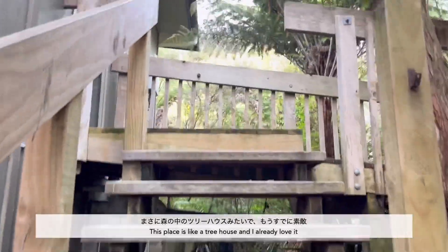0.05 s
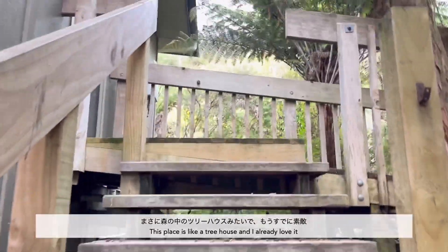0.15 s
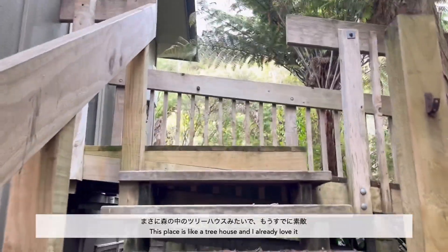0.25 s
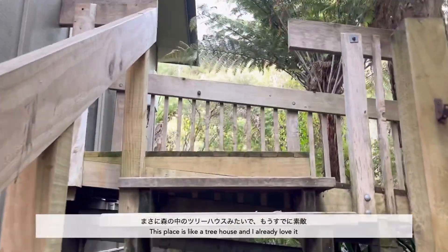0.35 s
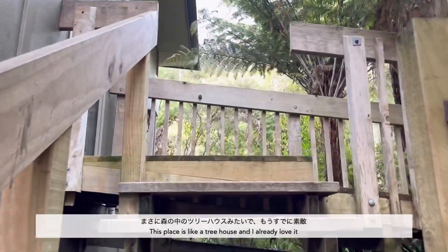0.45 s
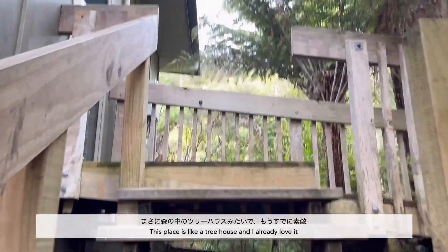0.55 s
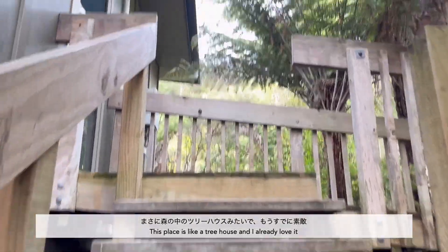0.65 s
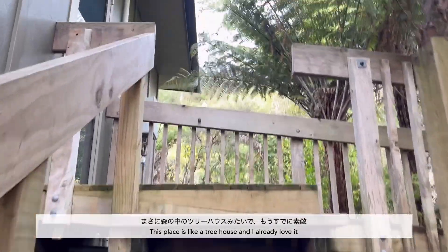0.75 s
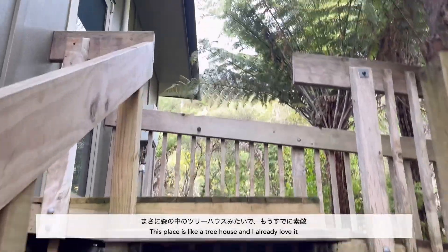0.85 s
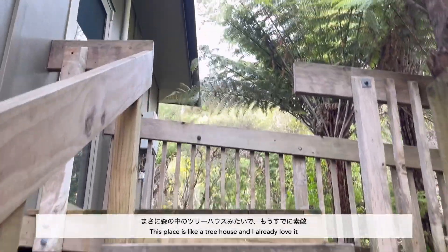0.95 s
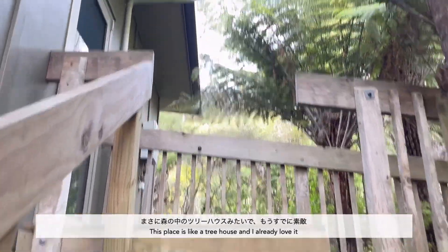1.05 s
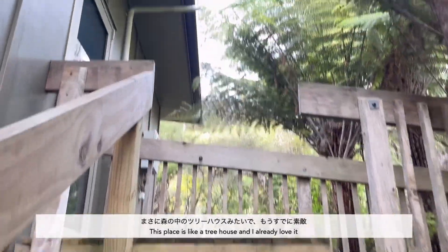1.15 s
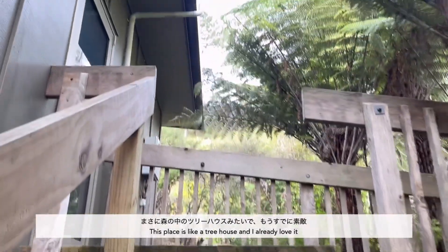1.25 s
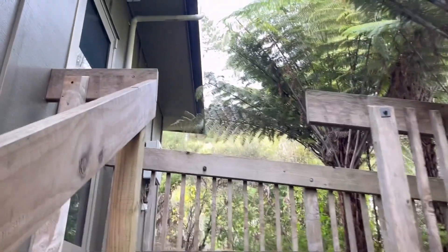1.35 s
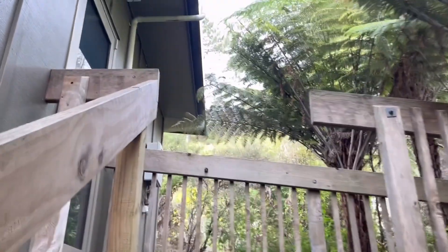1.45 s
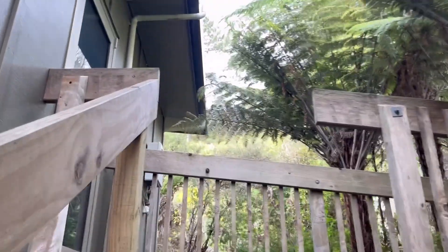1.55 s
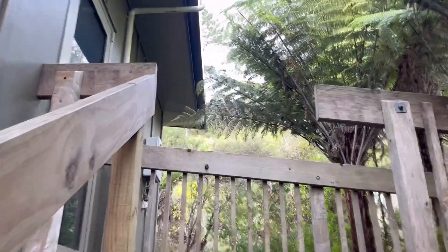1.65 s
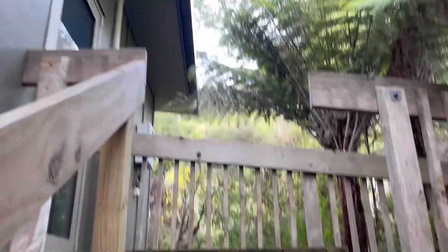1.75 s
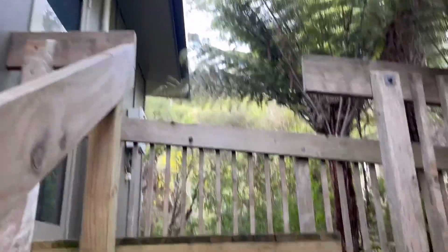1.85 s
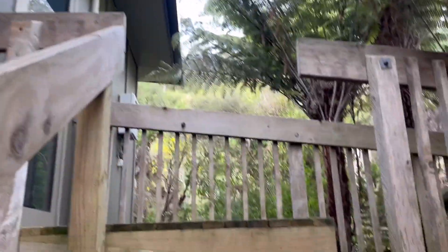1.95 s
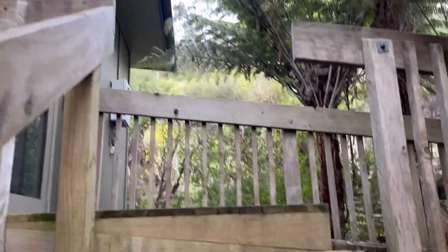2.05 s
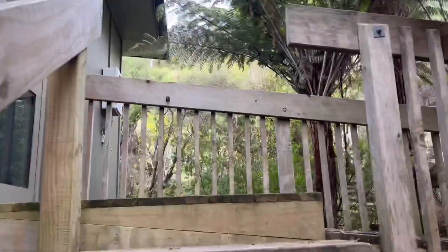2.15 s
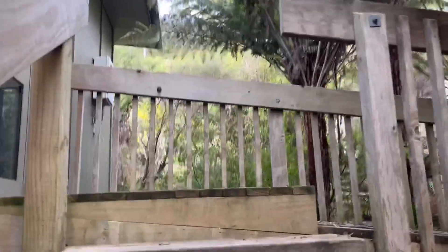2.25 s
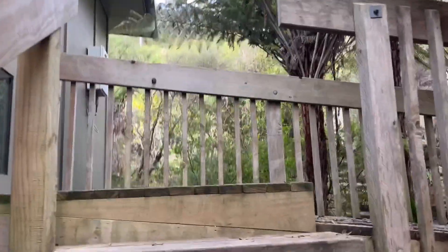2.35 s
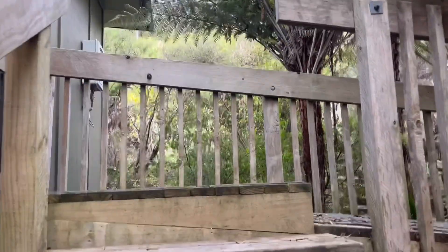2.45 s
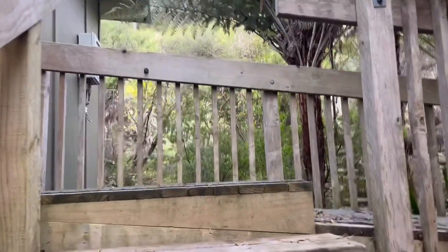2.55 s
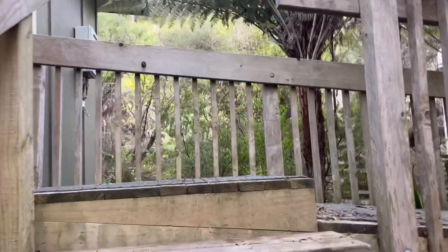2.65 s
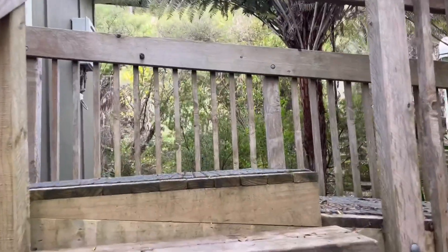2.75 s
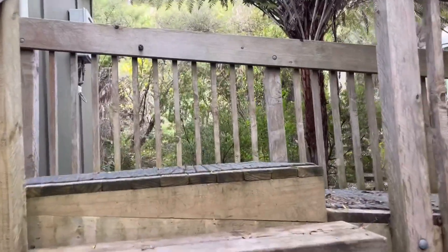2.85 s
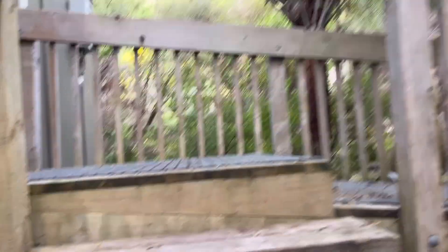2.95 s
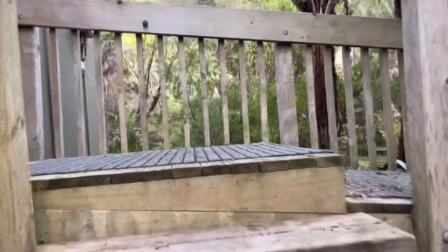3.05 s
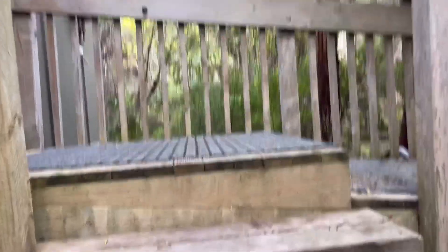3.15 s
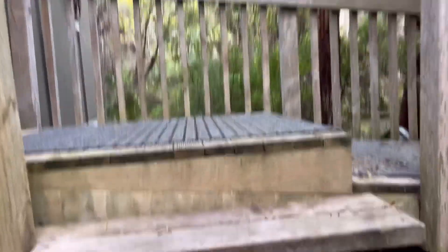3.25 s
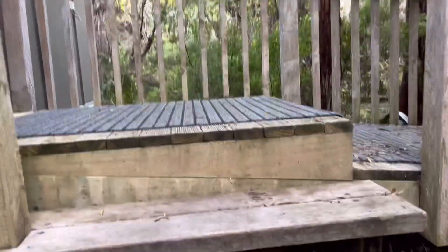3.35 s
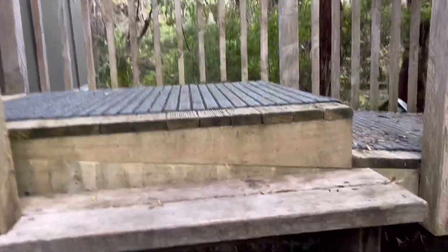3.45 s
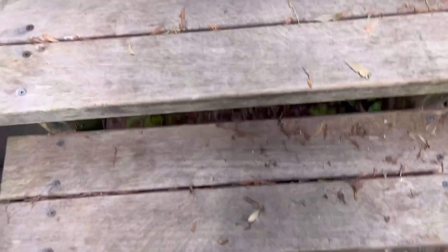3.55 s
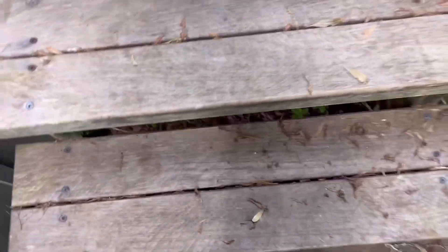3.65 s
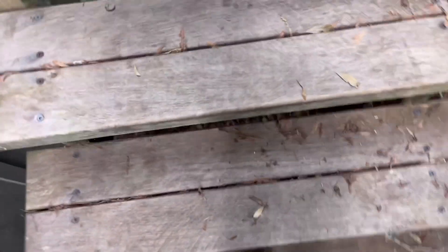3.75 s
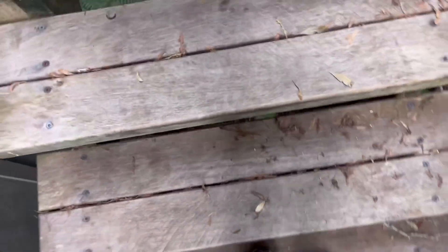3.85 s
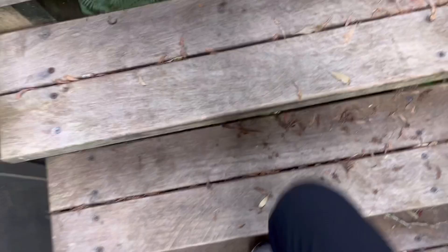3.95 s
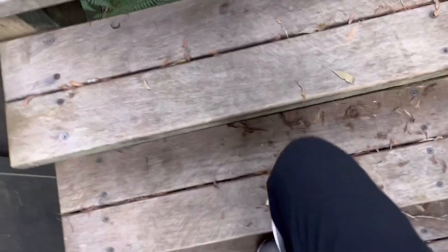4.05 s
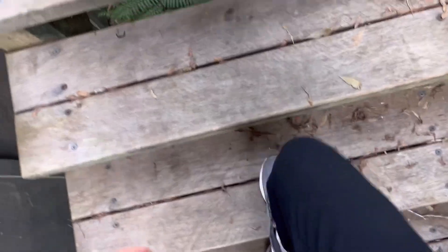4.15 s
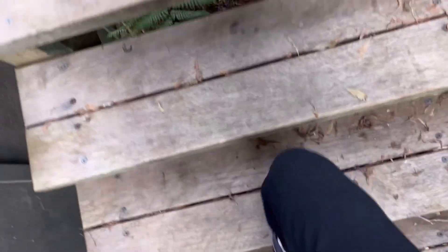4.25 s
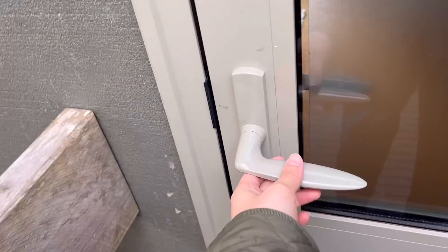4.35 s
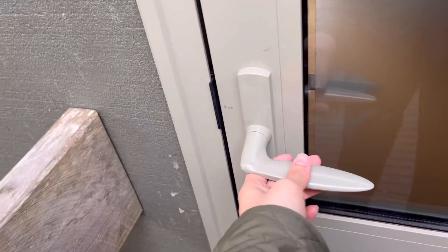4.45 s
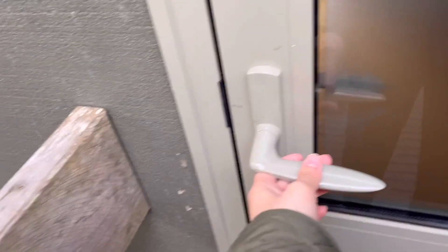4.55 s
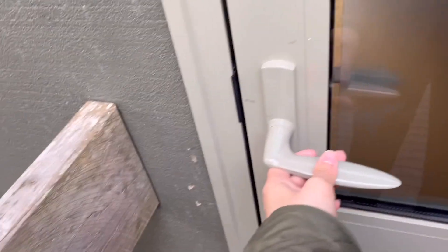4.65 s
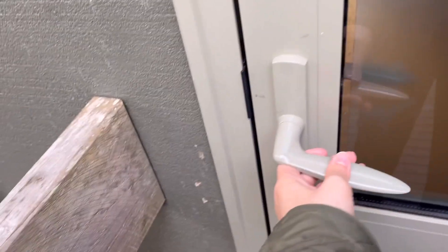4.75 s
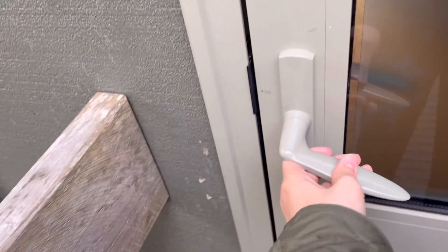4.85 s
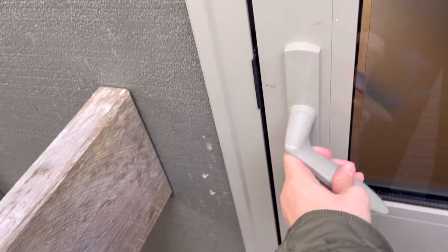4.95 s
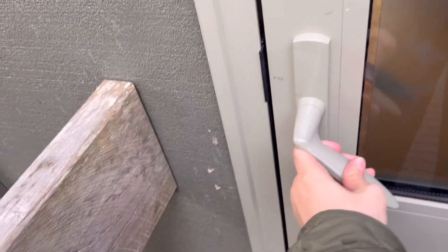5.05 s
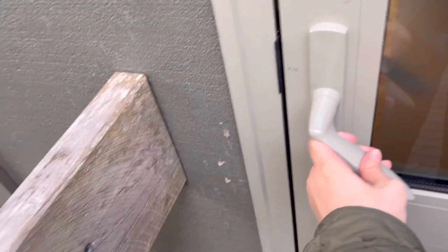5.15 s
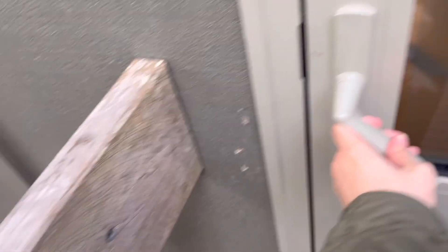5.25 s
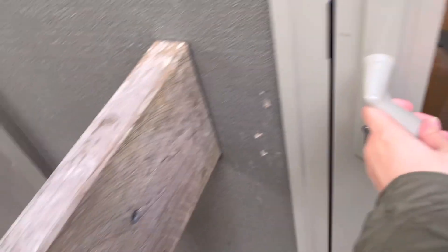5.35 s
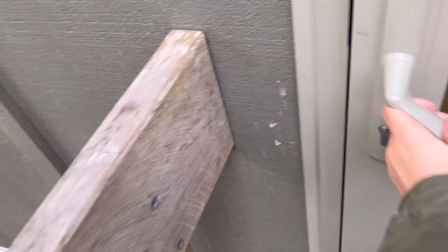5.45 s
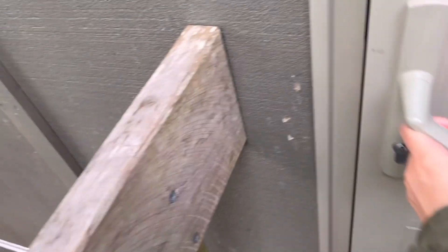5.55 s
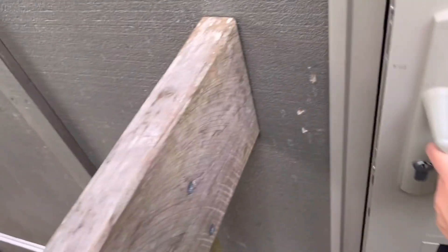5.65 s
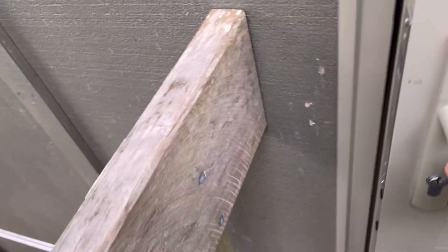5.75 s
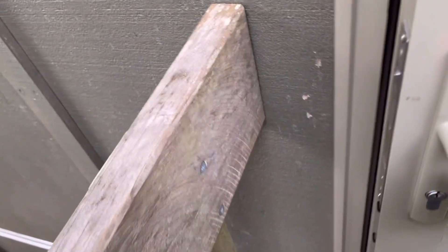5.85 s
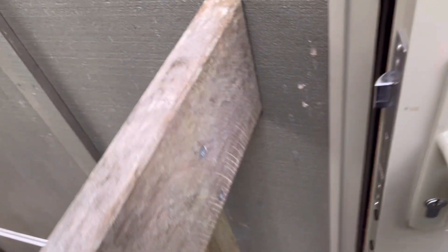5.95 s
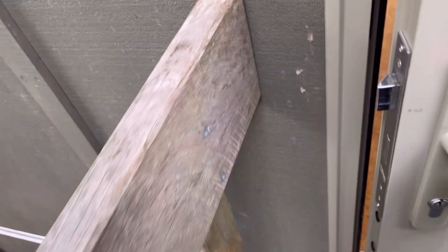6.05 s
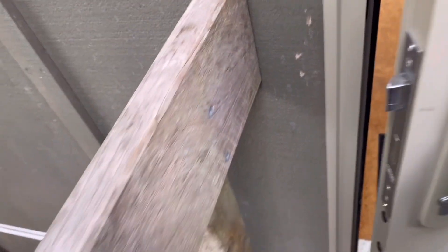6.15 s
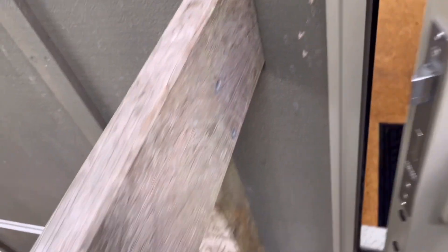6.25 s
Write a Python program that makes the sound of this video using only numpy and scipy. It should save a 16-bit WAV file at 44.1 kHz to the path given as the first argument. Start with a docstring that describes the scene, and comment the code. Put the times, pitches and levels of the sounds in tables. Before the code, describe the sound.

Slow, booming footfalls on timber boards, soft cloth rustle and quiet outdoor rumble, followed by a sharp cluster of door-lock clunks, squeak and latch rattles.

```python
"""Outdoor stairs, deck and door

Someone climbs wooden outdoor stairs, crosses a timber deck and opens a glazed metal door. Each shoe taps
a board and sets its modes booming; bolts, latch and leaf are struck as damped resonators, and the seal
drags by stick and slip. Shaped noise makes the jacket's rustle, the rumbling air and a brief bright hiss,
gliding sines the far bird and a slowly wavering sine the hum; the house wall answers with a diffuse decay."""
import sys
import numpy as np
from scipy import signal
from scipy.fft import rfft, irfft, next_fast_len
from scipy.io import wavfile
from scipy.ndimage import uniform_filter1d, map_coordinates

SR = 44100
rng = np.random.default_rng(int(sys.argv[2]) if len(sys.argv) > 2 else 0)


def put_to_file(sound):
    """Save the sound as 16-bit audio at rate SR, in the file named by the first command-line argument."""
    columns = np.atleast_2d(sound).T  # one column per channel
    safe = np.clip(columns, -1, 1)
    whole_steps = np.round(safe * 32767)
    wavfile.write(sys.argv[1], SR, whole_steps.astype(np.int16))


N = 277389
T = np.arange(SR // 3) / SR  # the life of one blow, t/s

# footfalls: t/s, board loading level/dB (before a 1.5 dB cut), sole strike level/dB,
# tap note f/Hz, its level/dB re strike, span mode f/Hz, plank mode f/Hz, its level/dB re span,
# twist mode f/Hz, its level/dB re span, cross-grain mode f/Hz, its level/dB (before a 5 dB cut)
FOOTFALLS = [(0.297, -49, -83, 1160, 2, 101.5, 159.3, 6.5, 205, -5, 370, -54.5),
             (0.549, -31.5, -46.5, 1600, 1, 125.7, 151, 5, 245.6, -7, 499, -48),
             (1.285, -47, -70, 1320, -1, 107, 126.3, 1, 205, -6.5, 377, -55),
             (1.350, -37, -52.5, 1290, -4, 94.6, 158, -4.5, 231.5, -15, 520, -50.5),
             (2.108, -30.5, -39.5, 1394, -7.5, 85, 146.2, 2.5, 189, -4, 632, -38),
             (2.833, -32, -43, 1392, -1, 91, 186.7, -5, 122, -2, 520, -36.5),
             (2.972, -40, -51, 1473, -0.5, 79.7, 149.6, -5, 123, -1, 522, -44.5),
             (2.995, -45.5, -55, 1095, -3, 78.2, 140.3, -8, 178, -8, 690, -50),
             (3.498, -30.5, -63, 1090, -7, 66.2, 175.2, -0.5, 120, -13, 431, -38),
             (3.571, -36.5, -54, 1570, 0, 70, 154.7, -2, 100, 0, 430, -45),
             (4.168, -33, -46, 1943, 0, 72, 195, -10, 269, -15, 598, -37.5)]


def amp(db):
    """Decibels to amplitude ratio: 20 dB is a factor of ten."""
    return 10 ** (np.asarray(db) / 20)


def unit(x):
    """Normalisation to an rms of 1."""
    return x / np.sqrt(np.mean(x ** 2) + 1e-20)


def struck(x, size=660):
    """Onset normalisation: the first samples of a blow are given an rms of 1."""
    return x / np.sqrt(np.mean(x[..., :size] ** 2) + 1e-20)


def along(points, hz):
    """Interpolation of (f/Hz, value) points on a logarithmic frequency axis."""
    f, v = np.transpose(points)
    return np.interp(np.log(hz + 1), np.log(f + 1), v)


def curve(rows):
    """Linear interpolation in time of (t/s, value) rows, one value per sample."""
    return np.interp(np.arange(N) / SR, *np.transpose(rows))


def wobble(rate):
    """Slow random modulation: a smooth spline through random knots, rate of them a second."""
    knots = rng.standard_normal(int(N * rate / SR) + 4)
    return map_coordinates(knots, [np.arange(N) * rate / SR])


def swell(s, length):
    """Gaussian envelope centred on s, with standard deviation length, both in seconds."""
    return np.exp(-.5 * ((np.arange(N) / SR - s) / length) ** 2)


def held(start, length, attack, release):
    """Linear attack, hold, and exponential decay of 60 dB per release time."""
    t = np.arange(N) / SR - start
    return np.clip(t / attack, 0, 1) * amp(-60 * np.maximum(t - length, 0) / release)


def filtered(x, response):
    """Linear filtering: the spectrum is multiplied by a response of frequency."""
    n = x.shape[-1]
    padded = next_fast_len(n + 8192)
    return irfft(rfft(x, padded) * response(np.fft.rfftfreq(padded, 1 / SR)), padded)[..., :n]


def panned(x, side):
    """Interaural level difference by (f/Hz, left-right level/dB) points."""
    return filtered(x, lambda hz: amp(np.outer([.5, -.5], along(side, hz))))


def leading(x, lead):
    """Interaural phase difference by (f/Hz, left lead/rad) points."""
    return filtered(x, lambda hz: np.exp(1j * np.outer([.5, -.5], along(lead, hz))))


def noise(spectrum, width, size):
    """Coloured stereo noise of rms 1; channel coherence is highest in the bass."""
    def mid_and_side(hz):
        spread = width * (hz + 130) / (hz + 900)
        return amp(along(spectrum, hz)) * [np.ones_like(hz), spread]

    mid, side = filtered(rng.standard_normal((2, size)), mid_and_side)
    return unit(np.array([mid + side, mid - side]))


def burst(spectrum, t60, width, attack):
    """High modal density: many short-lived resonances act as noise that builds up and decays."""
    envelope = amp(-60 * T / t60) * (1 - np.exp(-T / attack))
    return struck(noise(spectrum, width, len(T)) * envelope)


def ring(modes, attack, spread, pitch=1):
    """Modal superposition: damped sines, each of random strength, slight detuning and stereo phase."""
    hz, db, t60 = np.transpose(modes)[:, :, None]
    strength, phase, skew, detune = rng.standard_normal((4, len(modes), 1))
    decay = np.exp((db + 2.4 * strength - 60 * T / t60) * np.log(10) / 20)
    angle = (2 * np.pi * (pitch * hz * (1 + 0.004 * detune) * T + phase)).astype(np.float32)
    mid = np.sum(decay * np.cos(spread * skew) * np.sin(angle), 0)
    side = np.sum(decay * np.sin(spread * skew) * np.cos(angle), 0)
    return struck(np.array([mid + side, mid - side]) * (1 - np.exp(-T / attack)))


def twang(hz, t60):
    """Mode cluster: a small part's main mode stands between two weaker, shorter ones."""
    modes = [(hz * 0.897, -7, t60 * 0.66), (hz, 0, t60), (hz * 1.13, -5, t60 * 0.55)]
    return ring(modes, attack=0.0001, spread=0.31)


def crumbs(depth_db):
    """Granular fracture: an uneven gain, as of grains breaking one after another."""
    return unit(amp(depth_db * unit(uniform_filter1d(rng.standard_normal(len(T)), size=70))))


def answered(x, wet_db):
    """Diffuse reverberation: wall, eaves and railings return a blow, the treble dying soonest."""
    # reverberation time: f/Hz, t60/s
    wall_t60 = [(100, 0.53), (500, 0.15), (2000, 0.11), (6000, 0.09), (12000, 0.075)]
    hz, t, cells = signal.stft(rng.standard_normal((2, len(T))), SR, nperseg=256)
    fading = cells * amp(-60 * t / along(wall_t60, hz)[:, None])
    mid, side = signal.istft(fading, SR, nperseg=256)[1][:, :len(T)] * (1 - np.exp(-T / 0.01))
    tail = np.array([mid + 0.65 * side, mid - 0.58 * side])
    tail = tail / np.linalg.norm(tail[0])
    return x + amp(wet_db) * signal.fftconvolve(x, tail, axes=1)[:, :len(T)]


def add(track, s, x):
    """Superposition: x is mixed into the track at s seconds."""
    room = track[:, round(s * SR):][:, :len(T)]
    room += x[:, :room.shape[1]]


def boom(span_hz, plank_hz, plank_db, twist_hz, twist_db):
    """Gradual loading excites low modes: the span swings, the plank bends and twists, the frame shudders."""
    span = np.sin(2 * np.pi * span_hz * T) * amp(-60 * T / 0.36)
    plank = np.sin(2 * np.pi * plank_hz * T) * amp(plank_db - 60 * T / 0.38)
    twist = np.sin(2 * np.pi * twist_hz * T) * amp(twist_db - 60 * T / 0.27)
    shudder = [(20, -39), (55, 6), (110, 5), (200, 1.5), (280, -10.5), (450, -24.5), (1500, -100)]
    frame = noise(shudder, 0.12, len(T)) * amp(-4.0 - 60 * T / 0.27)
    return struck((span + plank + twist + frame) * (1 - np.exp(-(T / 0.015) ** 2)), size=1764)


def footsteps():
    """Impact on a plank: the tap, crushed grit, wooden knock and boom; softer strikes rise more slowly."""
    # the plank's higher modes: f/Hz, level/dB, t60/s
    plank_modes = [(242, -12.5, 0.15), (340, -7, 0.1), (411.4, 2.5, 0.13), (494, -3.5, 0.17),
                   (599, -2, 0.09), (695, 0, 0.06), (830, -5.5, 0.093), (957, -4, 0.096), (1113, -8, 0.062)]
    # spectral density of the crushed grit and of the hollow knock: f/Hz, level/dB
    grit_colour = [(700, -10), (2200, 0.5), (3500, 1.5), (5200, 7.5), (7000, -6.5), (8500, -23.5),
                   (11000, -17), (15500, -35)]
    knock_colour = [(40, -36), (120, -33), (300, 11.5), (520, 4.5), (1100, -8), (1600, -6), (3000, -65),
                    (8000, -101)]
    firm_db, full_weight_db = -41, -27.5  # strike and loading of a firm step
    knock_db, knock_grows = -39, 0.41  # at a firm step; dB per dB of strike and of loading
    grit_db, grit_grows = -50, 1.38  # at a firm step; dB per dB of strike, so soft steps crush little
    soft_landing_db = 6  # each such drop in strike doubles the rise time, down to 20 dB
    plank_scatter = 0.022  # standard deviation of the log pitch from plank to plank
    track = np.zeros((2, N))
    for s, weight_db, strike_db, tap_hz, note_db, *low_modes, cross_hz, cross_db in FOOTFALLS:
        pitch = np.exp(plank_scatter * rng.standard_normal())
        firmness = strike_db - firm_db
        rise = 0.00058 * 2 ** (np.clip(-firmness, 0, 20) / soft_landing_db)

        sole_colour = [(tap_hz / 10, -35), (tap_hz * 0.24, -10), (tap_hz * 0.52, -8),
                       (tap_hz, -2), (tap_hz * 1.55, -13), (tap_hz * 8, -80)]
        tread_modes = [(tap_hz * 0.75, -9, .035), (tap_hz * 0.93, -4, .035),
                       (tap_hz, 0, .04), (tap_hz * 1.08, -5, .03)]
        pop = ring(tread_modes, attack=rise, spread=0.61)  # the tread's short woody note
        sole = burst(sole_colour, t60=0.038, width=0.89, attack=rise)
        tap = amp(strike_db) * (0.88 * sole + amp(note_db) * pop)

        grains = struck(crumbs(2.5) * burst(grit_colour, t60=0.14, width=0.6, attack=0.00085))
        grit = amp(grit_db + grit_grows * firmness) * grains

        wood = 0.7 * ring(plank_modes, attack=0.0015, spread=0.6, pitch=pitch)
        wood = wood + 0.5 * burst(knock_colour, t60=0.077, width=0.6, attack=0.0044)
        knock = amp(knock_db + knock_grows * (firmness + weight_db - full_weight_db)) * wood

        cross = amp(cross_db - 5.0) * ring([(cross_hz, 0, .085)], attack=0.00079, spread=0.34)
        blow = answered(tap + grit + knock + cross, wet_db=-10.5)
        add(track, s, blow + amp(weight_db - 1.5) * boom(*low_modes))
    return track


def scuffs():
    """Sliding friction: rubber drags over gritty wood as flickering coloured noise."""
    # slides: centre t/s, level/dB, standard deviation t/s
    slides = [(0.54, -71, .006), (1.33, -65.5, .012), (2.106, -56, 0.0059), (3.792, -59.5, 0.037),
              (3.963, -56, 0.066), (4.177, -40, 0.0083), (4.443, -64.5, 0.012)]
    # spectral density: f/Hz, level/dB
    scuff_colour = [(400, 9.5), (1500, 1.5), (2600, 1.5), (4500, -2), (7000, -7), (8500, -18),
                    (11000, -6.5), (14000, -13), (15500, -24)]
    motion = sum(amp(db) * swell(s, length) for s, db, length in slides)
    return motion * unit(amp(1.3 * wobble(700))) * noise(scuff_colour, 0.51, N)


def metal_blow(clack_db, body_db, latch_db):
    """Hard impact: a brief crack excites the lock's clack, the latch's ring and the panel behind them."""
    # modes of the panel, the steel lock and the latch: f/Hz, level/dB, t60/s
    panel_modes = [(413, -6, 0.055), (486, -1.5, 0.11), (587, -8.5, 0.09), (656, -3, 0.04),
                   (853, 0.5, 0.047), (985, 0, 0.063), (1128, 6, 0.028), (1225, 0, 0.04),
                   (1333, -7.5, 0.076)]
    steel_modes = [(1598, -5, 0.06), (1952, -3, 0.073), (2114, -6, 0.076), (2284, -2, 0.084),
                   (2490, 0, 0.046), (2820, -1.5, 0.07), (3157, -6, 0.06), (3341, -6.5, 0.075)]
    latch_modes = [(4035, 7, 0.081), (4170, 3, 0.075), (4500, 5, 0.074), (4660, 3, 0.07), (5100, 1, 0.08),
                   (5850, -3, 0.05)]
    # spectral density of the panel's knock, the clack and the clink: f/Hz, level/dB
    hollow_colour = [(120, -30), (300, 3), (420, 1), (540, 6.5), (750, -2.5), (1100, -3), (1600, -6),
                     (3000, -60), (8000, -100)]
    clack_colour = [(500, -22), (1200, 5), (2000, 6), (2800, 3), (3600, 1), (5000, -14), (6200, -39),
                    (7500, -8.5), (9000, -58), (15000, -57)]
    clink_colour = [(500, -60), (2500, -43), (3600, -1), (4100, 3.5), (5200, -1.5), (6000, -5), (7000, -26),
                    (9000, -46), (15000, -73)]
    hardness = 1 + 1.6 * np.exp(-T / 0.0018)  # extra gain at the instant of contact

    panel = 0.67 * ring(panel_modes, attack=0.00038, spread=0.68)
    panel = panel + 0.59 * burst(hollow_colour, t60=0.058, width=0.74, attack=0.00031)

    clack = 0.49 * ring(steel_modes, attack=0.00046, spread=0.87)
    crack = burst(clack_colour, t60=0.082, width=0.41, attack=0.0002)
    clack = clack + 0.71 * struck(hardness * crack)

    latch = 0.31 * ring(latch_modes, attack=0.00015, spread=0.43)
    clink = burst(clink_colour, t60=0.059, width=0.39, attack=0.00016)
    latch = latch + 0.45 * struck(hardness * clink)
    return amp(clack_db) * (clack + amp(body_db) * panel + amp(latch_db) * latch)


def door():
    """Impact with play: each part touches, seats with a blow that thumps the leaf, and bounces once."""
    # handle, bolt and latch contacts: t/s, play before seating t/s, clack level/dB,
    # body, latch ring and tick level/dB re clack, the part's note f/Hz,
    # its level/dB re clack (before a 3 dB cut), leaf thump level/dB
    contacts = [(4.512, 0.0036, -68.5, 16, -23, -24, 790, 15, -50),
                (4.7185, 0.00061, -46, 4, -12, -40, 1146, 5.5, -47),
                (4.7235, 0.0012, -51, 2.5, -7, -35, 970, 4, -44.5),
                (4.786, 0.0012, -46.5, -2.5, -10, -28, 1251, 4.5, -48),
                (4.7924, 0.0008, -47.5, -1, -7, -30, 3300, 0.5, -43),
                (4.7985, 0.001, -50, 2, -12, -35, 1520, 1, -40),
                (4.909, 0.0036, -37.5, -3.5, -0.5, -3.5, 995, -4, -44),
                (4.9295, 0.0015, -36, 3.5, -5, 0.5, 1155, 9.5, -42),
                (4.935, 0.003, -31.5, 7, -0.5, -3, 850, 5.5, -34),
                (4.9412, 0.000996, -29, 3, 1.5, -14.5, 2500, 0.5, -37),
                (5.176, 0.001, -46.5, -4, -6, -10, 2620, 2.5, -52),
                (5.1894, 0.0012, -40, -4, -2, -4, 2540, 3.5, -44.5),
                (5.257, 0.0031, -40.5, 2.5, -2, -12.5, 1390, 1.5, -43),
                (5.265, 0.0025, -46, 2.5, -8, -12, 1000, 0, -47),
                (5.3208, 0.0012, -44, -1, -16, -24, 1600, 6.5, -47.5),
                (5.4016, 0.002, -39, -10, -1.5, -13, 1953, 7, -48),
                (5.534, 0.0015, -59, 10, -16, -31, 910, 3, -48.5),
                (5.547, 0.0035, -58, 8.5, -16, -31, 1330, -6, -47.5),
                (5.8052, 0.001, -35.5, -8, -3.5, -12, 1950, -5, -45.5),
                (5.8096, 0.002, -36, 0, 1, -21, 1580, -10, -41.5),
                (5.9045, 0.0048, -29.5, -9, 10.5, -2.5, 4320, 5, -49),
                (5.918, 0.0039, -35, 4.5, 1, -22, 1200, -4, -43),
                (5.946, 0.00098, -32.5, -9, -4, -16, 2090, 0.5, -48),
                (5.9507, 0.00098, -29, -4, 3, -17.5, 1260, -3, -42.5),
                (6.0725, 0.0049, -35, 0, -3, -7.5, 1266, -1, -44.5),
                (6.081, 0.002, -37.5, 3, -6, -6.5, 545, 9.5, -43.5)]
    # the leaf's modes: f/Hz, level/dB, t60/s
    leaf_modes = [(69.2, -3.5, 0.16), (112, 0.5, 0.11), (149.8, -1.5, 0.23), (202, -3.5, 0.1),
                  (261.3, -1, 0.064), (321, -12, 0.098)]
    # spectral density of the tick and of the leaf's slow sway: f/Hz, level/dB
    tick_colour = [(2000, -34), (6000, 4), (8500, 1.5), (10500, 4.5), (13000, -7.5), (15800, -14)]
    sway_colour = [(20, -12), (45, -13), (70, 9), (100, -16), (200, -40), (600, -95.5)]
    touch_db = -7.5  # the light first touch, relative to the seating blow
    sway_db, sway_t60_s, sway_attack_s = -6, 0.59, 0.022  # level relative to the thump
    rebound_s, rebound_db, rebound_scatter = .02, -21, .25  # median flight, loss, log deviation of flight
    track = np.zeros((2, N))
    for s, play_s, clack_db, body_db, latch_db, tick_db, note_hz, note_db, thump_db in contacts:
        tick = amp(clack_db + tick_db) * burst(tick_colour, t60=0.04, width=0.27, attack=0.00034)
        touch = metal_blow(clack_db + touch_db, body_db, latch_db)
        add(track, s, answered(tick + touch, wet_db=-15.5))

        sway_envelope = amp(sway_db - 60 * T / sway_t60_s) * (1 - np.exp(-T / sway_attack_s))
        sway = noise(sway_colour, 0.13, len(T)) * sway_envelope
        leaf = amp(thump_db) * (ring(leaf_modes, attack=0.0036, spread=0.06) + sway)
        note = amp(clack_db + note_db - 3.0) * twang(note_hz, t60=0.033)
        blow = metal_blow(clack_db, body_db, latch_db)
        add(track, s + play_s, answered(blow + leaf + note, wet_db=-13.5))

        flight_s = rebound_s * np.exp(rebound_scatter * rng.standard_normal())
        add(track, s + play_s + flight_s, amp(rebound_db) * blow)
    return track


def bolts():
    """Arrested motion: the locking bar stops dead, rings the hollow stile and shakes the frame."""
    # ends of travel: t/s, level/dB
    stops = [(4.932, -32.5), (4.9379, -19)]
    # modes of the hollow stile and of the door frame: f/Hz, level/dB, t60/s
    stile_modes = [(490, 0, 0.095), (560, 4, 0.036), (851, -1.5, 0.066), (952, -9, 0.06), (1155, -4, 0.07),
                   (1325, -12, 0.065), (2264, -13, 0.06), (2820, -9, 0.06), (3150, -10.5, 0.05)]
    frame_modes = [(128, -2, 0.14), (152.7, 3, 0.23), (258, -4.5, 0.11)]
    shake_db = -11  # relative to the stile's ring
    track = np.zeros((2, N))
    for s, db in stops:
        stile = ring(stile_modes, attack=0.0027, spread=0.17)
        frame = ring(frame_modes, attack=0.0013, spread=0.11)
        add(track, s, answered(amp(db) * (stile + amp(shake_db) * frame), wet_db=-22.5))
    return track


def seal():
    """Stick-slip friction: seal and hinges rub, slips ring the lock's case, and parting makes a hiss."""
    # rubs on seal, hinges and latch: start t/s, length t/s, level/dB before the rub and slip shares
    rubs = [(5.196, 0.027, -42.5), (5.262, 0.16, -42.5), (5.762, 0.4, -52.5), (5.888, .012, -36)]
    # resonances of the lock's case: f/Hz, bandwidth f/Hz, level/dB
    case_modes = [(616, 120, -9), (1000, 110, -3), (1410, 93, 4), (1870, 150, -1), (2640, 140, -4),
                  (4200, 400, -9.5)]
    # the seal peeling free: centre t/s, standard deviation t/s, level/dB
    peel_s, peel_length, peel_db = (5.385, 0.049, -47.5)
    # spectral density of the rub and of the peel: f/Hz, level/dB
    rub_colour = [(120, -38), (200, -14), (383, -6), (485, -8), (789, -7), (1410, -7), (7020, -21.5),
                  (8120, -29), (9380, -24), (12100, -27), (15000, -46)]
    peel_colour = [(1200, -25), (2300, -3), (2800, 4), (3400, -9), (4300, -1), (5300, -13), (6800, -3),
                   (8500, -11), (11500, -7), (15000, -30)]
    rub_attack_s, rub_release_s = 0.022, 0.18  # rise; fall by 60 dB
    slips_per_s, slip_scatter_db = 220, 3.5  # mean rate of random slips; deviation of their level

    def case(f):
        """Resonant response: a sum of band-pass modes of alternating sign."""
        total = 0
        for k, (hz, bandwidth, db) in enumerate(case_modes):
            damping = 1j * f * bandwidth
            total = total + (-1) ** k * amp(db) * damping / (hz * hz - f * f + damping)
        return total

    jerks = (rng.random(N) < slips_per_s / SR) * amp(slip_scatter_db * rng.standard_normal(N))
    slips = unit(filtered(jerks * (1 + 0.54 * rng.standard_normal((2, N))), case))
    drag = sum(amp(db) * held(s, length, rub_attack_s, rub_release_s) for s, length, db in rubs)
    peel = amp(peel_db + 1.9 * wobble(320)) * swell(peel_s, peel_length) * noise(peel_colour, 0.55, N)
    rub = amp(1.8 * wobble(210)) * noise(rub_colour, 0.7, N)
    return drag * (0.49 * rub + 0.53 * slips) + peel


def squeaks():
    """Friction-driven oscillation: a binding board or metal joint sings on one rough, unsteady note."""
    # board creak, then handle and door: start t/s, length t/s, level/dB, mean f/Hz
    creaks = [(3.778, .045, -63, 2590), (4.873, 0.041, -58, 1104), (5.276, 0.047, -44, 1080),
              (5.325, 0.11, -58, 2820)]
    waver = np.cumsum(1 + 0.035 * wobble(600)) / SR  # time that runs unevenly
    notes = 0
    for s, length, db, hz in creaks:
        envelope = held(s, length, attack=.012, release=.06)
        notes = notes + amp(db) * envelope * np.sin(2 * np.pi * hz * waver)
    return notes * amp(3.6 * wobble(160))


def ticks():
    """Light impact: boards, shoes and loose fittings give a short note with a dry crack around it."""
    # touches: t/s, level/dB, f/Hz, t60/s
    touches = [(0.036, -57.5, 1060, 0.052), (1.351, -59.5, 4800, 0.022), (3.349, -51, 1400, .02),
               (3.364, -56, 1250, 0.018), (3.899, -48.5, 684, 0.023), (3.977, -55.5, 756, 0.033),
               (4.693, -54, 1214, 0.065), (4.821, -47, 1000, 0.018), (4.845, -54, 1060, 0.031),
               (4.968, -40, 3650, .018), (4.981, -34.5, 1070, 0.033), (4.983, -45, 1860, 0.035),
               (5.024, -56.5, 4340, 0.013), (5.213, -38, 1166, 0.035), (5.301, -43, 1400, 0.02),
               (5.403, -35, 1440, 0.04), (5.417, -44, 2300, 0.02), (5.562, -58, 3330, .03)]
    track = np.zeros((2, N))
    for s, db, hz, t60 in touches:
        crack_colour = [(hz / 6, -24), (hz * 0.32, -6), (hz, 0), (hz * 0.77, -6), (hz * 2.2, -24), (hz * 9, -60)]
        crack = burst(crack_colour, t60, width=0.59, attack=0.00052)
        add(track, s, answered(amp(db) * (0.37 * twang(hz, t60) + 0.5 * crack), wet_db=-10.5))
    return track


def jacket():
    """Fabric friction: cloth brushes twice after each heavier footfall, then as the arm works the door."""
    # swishes in a stride: delay after the footfall t/s, level/dB, standard deviation t/s
    swish_rows = [(0.158, -65, 0.066), (0.344, -69, 0.031)]
    # the sleeve while the arm works the door: start t/s, length t/s, level/dB
    start, length, reach_db = (4.7, 1.6, -58.5)
    # spectral density: f/Hz, level/dB
    cloth_colour = [(60, -45), (200, 14.5), (450, 11.5), (1100, 5.5), (1700, 2), (2400, -3.5), (3500, -3.5),
                    (5000, -7), (7000, -14), (8500, -29.5), (11000, -15.5), (15000, -26.5)]
    stride_db = -38.5  # a footfall loading the board more than this carries the body forward
    rest_db = -72.5  # the rustle between swishes
    strides = [s for s, weight_db, *_ in FOOTFALLS if weight_db > stride_db]
    swishes = sum(amp(db) * swell(s + delay, sigma) for s in strides for delay, db, sigma in swish_rows)
    reach = amp(reach_db) * held(start, length, attack=0.26, release=.5)
    motion = amp(rest_db) + swishes + reach
    return motion * amp(0.74 * wobble(18) + 1.9 * wobble(170)) * noise(cloth_colour, 1.0, N)


def sleeves():
    """Fabric friction: a sleeve brushes the jacket lightly, as grainy coloured noise."""
    # brushes: centre t/s, level/dB, standard deviation t/s
    brushes = [(0.722, -76, 0.021), (1.715, -67, 0.026), (2.41, -68.5, 0.022), (2.66, -71, 0.044),
               (3.173, -75, 0.021)]
    # spectral density: f/Hz, level/dB
    brush_colour = [(300, -7.5), (1500, -1), (2600, -6), (5200, 0.5), (7000, -8), (8500, -24), (11000, -19),
                    (15500, -26)]
    motion = sum(amp(db) * swell(s, length) for s, db, length in brushes)
    return motion * amp(1.8 * wobble(200)) * noise(brush_colour, 0.7, N)


def bird():
    """Frequency modulation: thin, gliding notes from the bush, with one delayed, fainter echo."""
    # notes: centre t/s, f/Hz at the centre, level/dB, standard deviation t/s, glide Hz/s
    chirps = [(1.506, 4690, -60, 0.012, 500), (1.505, 5850, -66.5, 0.011, 800),
              (1.522, 3350, -73, 0.01, -6000), (1.524, 4330, -67, 0.008, -7000),
              (2.293, 4850, -71, 0.004, 6000), (2.298, 5150, -67.5, 0.007, 2000),
              (2.795, 6000, -75, 0.018, 1500)]
    echo_s, echo_db = 0.042, -12
    t = np.arange(N) / SR
    waver = 1 + 0.004 * wobble(450)
    notes = 0
    for s, hz, db, length, glide in chirps:
        cycles = np.cumsum(hz * waver + glide * (t - s)) / SR
        notes = notes + amp(db) * swell(s, length) * np.sin(2 * np.pi * cycles)
    notes = notes * amp(1.8 * wobble(170))
    return notes + amp(echo_db) * np.roll(notes, round(echo_s * SR))


def air():
    """Broadband noise and a tone: outdoor rumble, a slowly wavering hum and a brief bright hiss."""
    # spectral density of the rumble and of the hiss: f/Hz, level/dB
    rumble_colour = [(20, -11), (50, 3), (70, 0), (110, -4.5), (160, -7.5), (250, -15.5), (480, -22),
                     (850, -21), (1450, -28.5), (2300, -50), (5200, -38.5), (6500, -42.5), (8200, -60.5),
                     (15500, -56.5)]
    hiss_colour = [(240, 10), (400, -1), (1380, -11.5), (2590, -8.5), (6680, -15.5), (8150, -32),
                   (9210, -15), (11800, -14.5), (14100, -19), (15500, -51)]
    # the background hiss starts and stops abruptly: start t/s, length t/s
    hiss_span = (3.497, .871)
    # its level, dipping in between: t/s, level/dB
    hiss_course = [(3.5, -51.5), (3.95, -74.5), (4.08, -65), (4.2, -50.5)]
    rumble = amp(-57.0 + 1.4 * wobble(5.0)) * noise(rumble_colour, 1.0, N)
    hum_angle = 2 * np.pi * 100 * np.arange(N) / SR + .5 * wobble(4.6)
    hum = amp(-57.5 + 0.81 * wobble(2.7)) * np.sin(hum_angle)
    hiss_gain = amp(curve(hiss_course)) * held(*hiss_span, attack=0.0023, release=0.0065)
    return rumble + hum + hiss_gain * noise(hiss_colour, 0.72, N)


def scene():
    """Superposition of sources: the door's treble leans left while its opening leaf moves to the right."""
    # stereo tilt of the steps, the door and the open leaf: f/Hz, left-right level/dB
    step_side = [(200, 0.86), (500, 1), (1500, -0.7), (4000, 3.5), (6500, 5), (9000, -0.5)]
    door_side = [(200, -0.5), (700, 1), (2400, 1), (4400, 5.5), (8500, -0.5)]
    swung_side = [(150, -4.5), (400, -2.5), (900, -2), (2000, -0.5), (4000, 0)]
    # stereo phase of the open leaf: f/Hz, left lead/rad
    swung_lead = [(150, -0.21), (400, -0.58), (900, -1.7), (2000, -0.49), (4000, -0.1)]
    # the leaf's travel: t/s, share from 0 to 1
    swing = [(5.0, 0), (5.3, 0.5), (5.8, 1)]
    opening = panned(door() + bolts() + seal() + squeaks(), door_side)
    swung = curve(swing)
    opened = leading(panned(opening, swung_side), swung_lead)
    opening = (1 - swung) * opening + swung * opened
    steps = panned(footsteps() + scuffs(), step_side)
    return steps + ticks() + opening + jacket() + sleeves() + bird() + air()


def record(dry):
    """Phase difference and band limit: the left channel lags in the treble, and the top is cut off."""
    # stereo phase: f/Hz, left lead/rad
    channel_lead = [(20, 0), (200, 0), (900, 0.75), (2000, 0.5), (4500, 0.93), (6000, -1.04), (7400, -2),
                    (8300, -3.5), (10000, -4.5), (15000, -5.5)]
    top_hz = 15700
    return filtered(leading(dry, channel_lead), lambda hz: hz < top_hz)


dry = scene()
out = record(dry)
put_to_file(out)
```